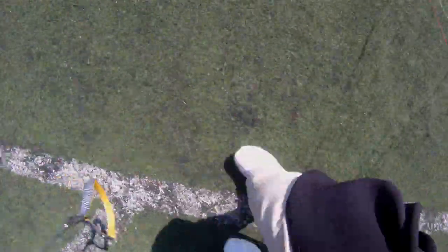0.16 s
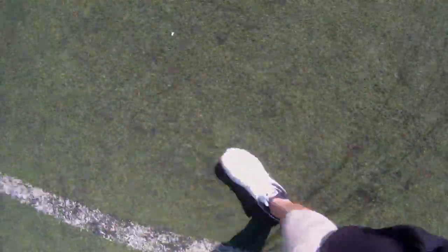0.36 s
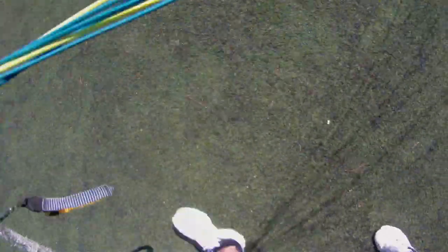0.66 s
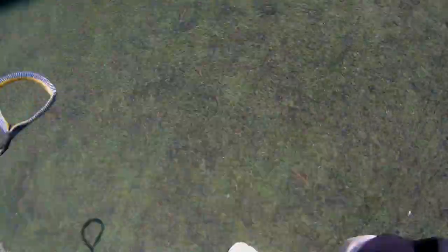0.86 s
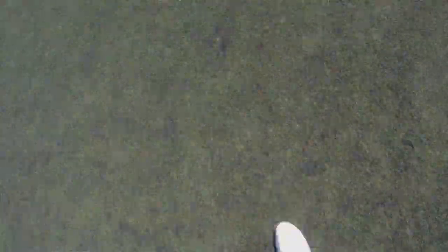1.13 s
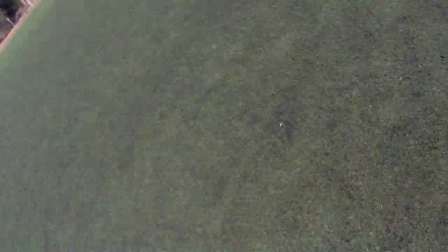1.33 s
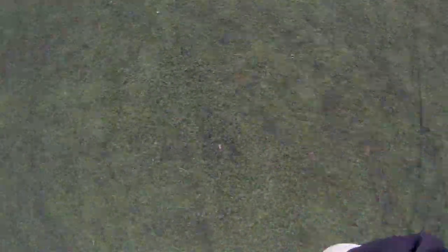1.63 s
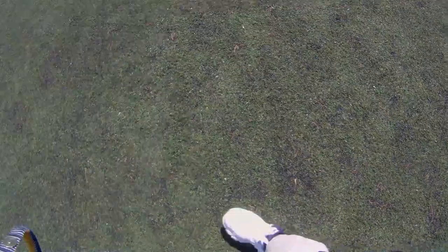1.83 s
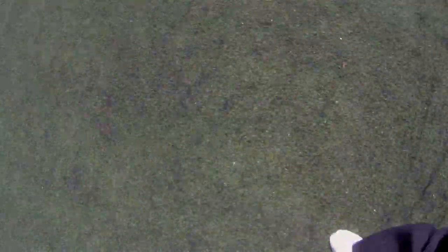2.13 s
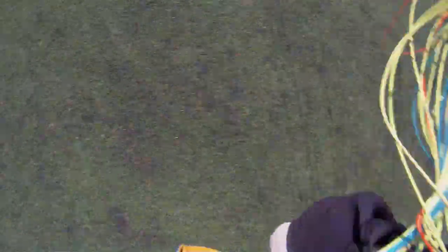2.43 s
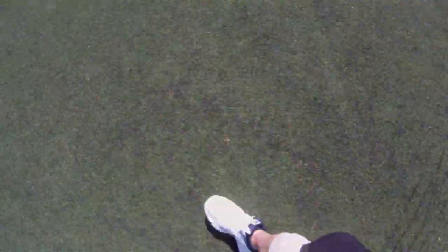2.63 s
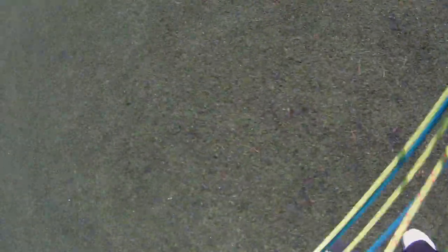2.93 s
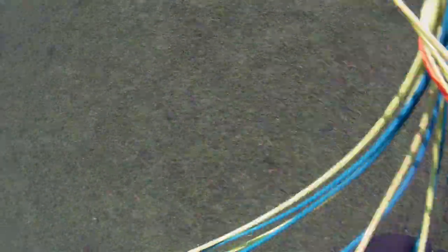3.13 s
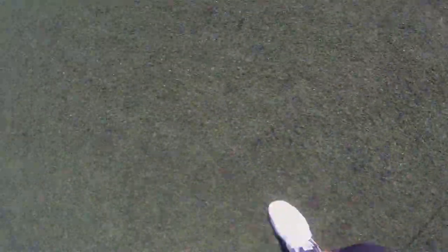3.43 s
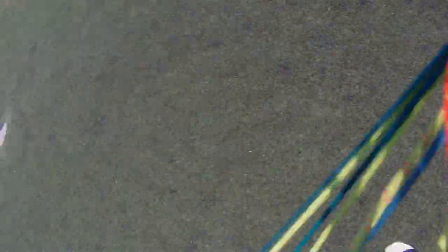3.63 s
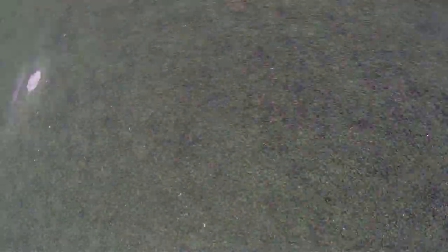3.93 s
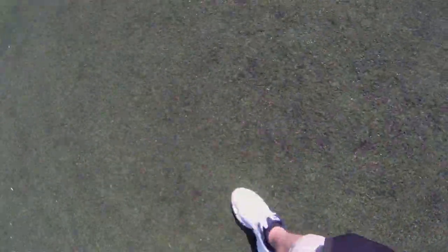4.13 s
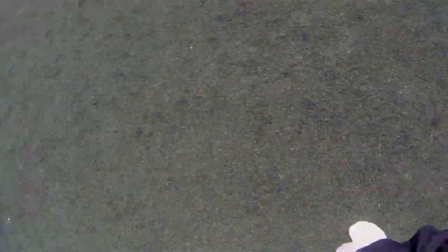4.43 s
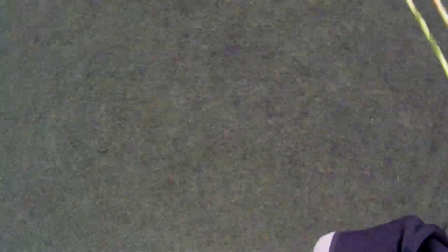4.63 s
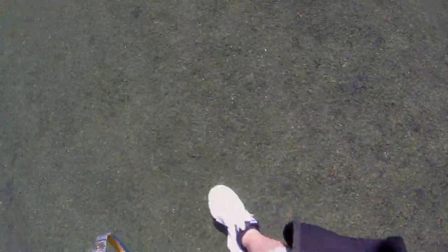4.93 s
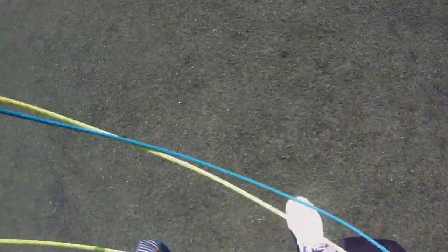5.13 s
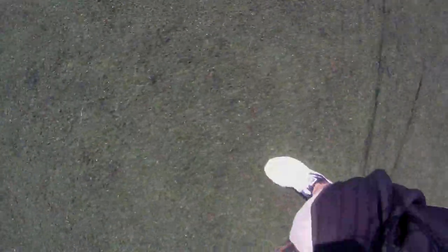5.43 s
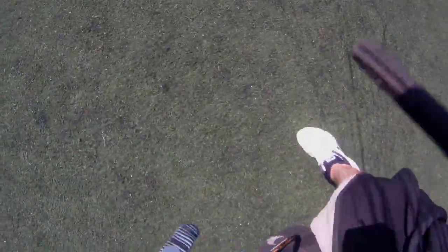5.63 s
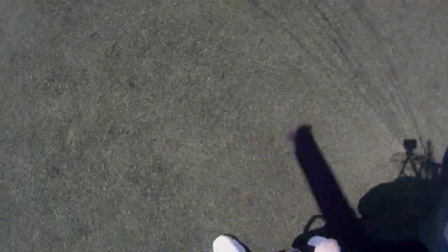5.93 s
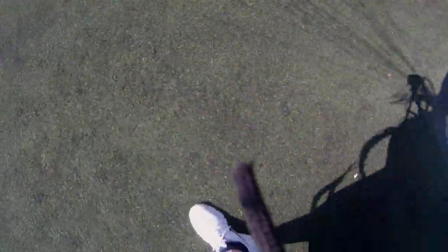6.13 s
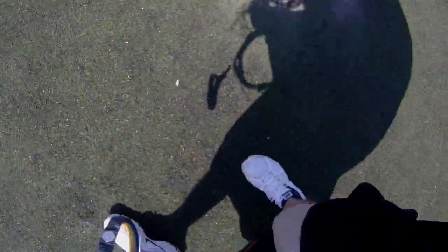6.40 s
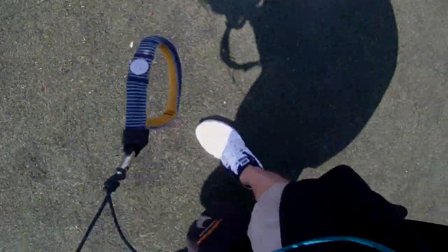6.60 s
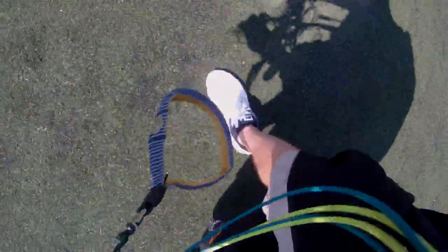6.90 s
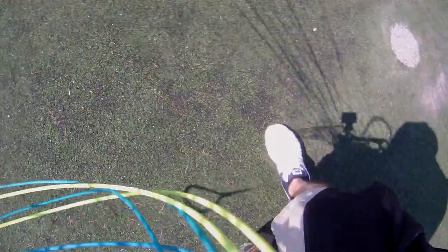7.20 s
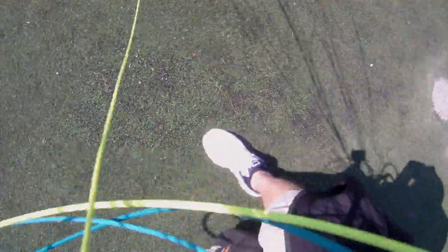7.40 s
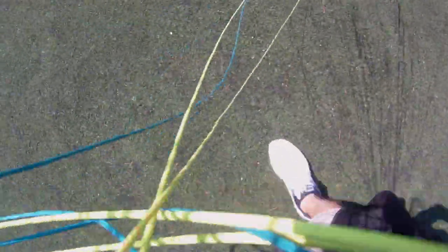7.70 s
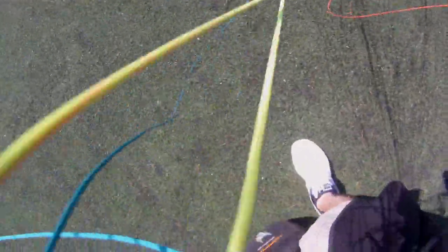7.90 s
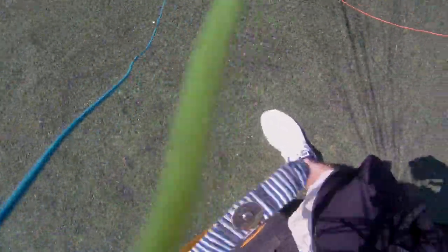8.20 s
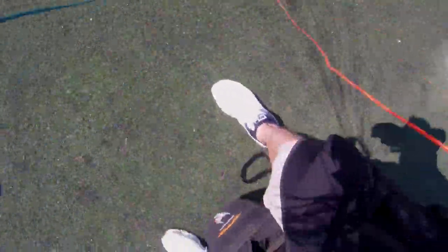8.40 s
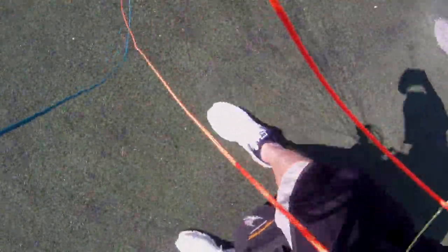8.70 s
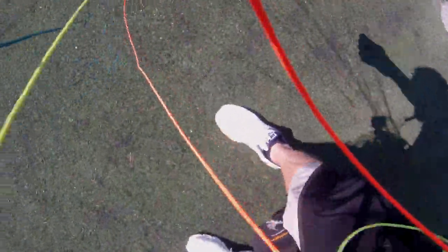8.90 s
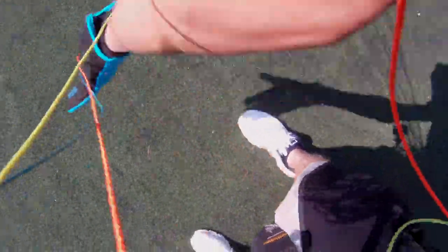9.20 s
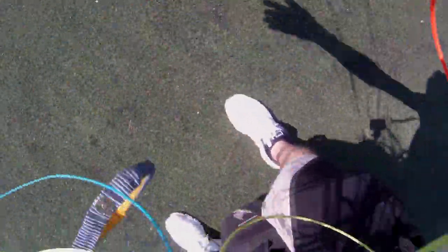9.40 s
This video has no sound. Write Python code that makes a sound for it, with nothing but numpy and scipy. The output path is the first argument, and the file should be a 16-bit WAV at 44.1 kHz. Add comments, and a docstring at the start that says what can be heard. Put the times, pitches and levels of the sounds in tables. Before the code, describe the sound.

Nylon fabric rubs and crinkles very close to a body-worn microphone on an open field, over faint wind rumble. At about 0.5 seconds comes a loud, sharp cluster of snaps with a knock, and around 1 second another crackling burst with a short strap creak. Faint, dull footsteps on turf run from 1 to 6 seconds, nearly three a second. The cloth settles into quiet brushing, with crisp bursts near 3, 3.7 and 5.3 seconds. Light hardware taps sound at 5 seconds and cluster between 5.9 and 6.6, among more crinkles. A thin creak at 7.6 seconds leads into a line zipping over the weave, rising and falling in pitch twice between 7.8 and 8.3, with loud rustling. Rubbing and small creaks continue to 9 seconds, the wind grows slightly, and a last rustle swells at about 9.5.

```python
"""On an open field, a pilot walks over turf gathering a nylon wing and its lines. Wind rumble and footfalls lie
beneath the friction of cloth: it rubs and crinkles, straps creak, and a line zips over the weave. Buckling
creases snap in short bursts, the larger ones with a dull low body. The near sounds excite the resonant modes of
the housing of a small body-worn camera, and the loudest snaps overload its microphone."""
import sys
import numpy as np
from scipy import signal
from scipy.io import wavfile

SR = 44100
rng = np.random.default_rng(int(sys.argv[2]) if len(sys.argv) > 2 else 0)


def persist_wave(psi):
    """Save psi, clipped to +-1, as 16-bit WAV."""
    counts = np.round(np.clip(psi, -1, 1) * 32767).astype(np.int16)
    wavfile.write(sys.argv[1], SR, np.atleast_2d(counts).T)


N = 421155


def from_db(db):
    """Amplitude ratio of a level: a factor of ten per 20 dB."""
    return 10 ** (np.asarray(db) / 20)


def unit_rms(x):
    """Normalisation to unit mean power."""
    return x / np.sqrt(np.mean(x ** 2) + 1e-20)


def curves(rows):
    """Linear interpolation of each column over the times in the first."""
    times, *columns = np.transpose(rows)
    return [np.interp(np.arange(N) / SR, times, column) for column in columns]


def drift(corner_hz):
    """Random modulation: low-passed noise of unit rms."""
    pole = np.exp(-2 * np.pi * corner_hz / SR)
    return unit_rms(signal.lfilter([1], [1, -2 * pole, pole * pole], rng.standard_normal(N + SR))[SR:])


def band(x, low_hz, high_hz):
    """Band-pass filtering with a maximally flat passband."""
    return signal.sosfilt(signal.butter(2, [low_hz, high_hz], "band", fs=SR, output="sos"), x)


def unit_energy(sounds):
    """Normalisation of each row to unit energy."""
    return sounds / np.linalg.norm(sounds, axis=1, keepdims=True)


def superpose(starts, levels_db, sounds):
    """Superposition of transients; each level is that of the energy spread over 4 ms."""
    sounds = from_db(levels_db) * unit_energy(sounds) * np.sqrt(.004 * SR)
    out = np.zeros(N + SR)
    for start, sound in zip(starts, sounds):
        i = int(start * SR)
        out[i:i + len(sound)] += sound
    return out[:N]


def crinkle(per_s, spread_db, hiss):
    """Shot noise: tiny creases of uneven size give way in clumps, over friction hiss."""
    sizes = from_db(spread_db * np.minimum(rng.exponential(1, N), 5)) * rng.choice([-1, 1], N)
    buckles = rng.random(N) < per_s * from_db(5 * drift(25)) / SR
    mix = (unit_rms(sizes * buckles) + hiss * rng.standard_normal(N)) / np.sqrt(1 + hiss ** 2)
    return mix * from_db(1.83 * drift(30.27))


# Modes of the camera housing: (frequency [Hz], bandwidth [Hz], gain [dB])
LOW_MODES = [(736, 390, -15.5), (1346, 370, -3.5)]
MID_MODES = [(2225, 180, -0.6), (2938, 324, 5.5), (3584, 410, 4), (4847, 302, 4), (5470, 605, -6),
             (7080, 870, -14)]
HIGH_MODES = [(10200, 1700, -15), (12740, 18000, 1), (15600, 560, 13)]
def resonate(x, modes):
    """Modal superposition: damped resonators in parallel, with alternating signs."""
    out = 0
    for k, (hz, width_hz, db) in enumerate(modes):
        radius = np.exp(-np.pi * width_hz / SR)
        b = (1 - radius * radius) / 2 * np.array([1, 0, -1])
        a = [1, -2 * radius * np.cos(2 * np.pi * hz / SR), radius * radius]
        out = out + (-1) ** k * from_db(db) * signal.lfilter(b, a, x)
    return out


def ring_each(bursts, pitches_hz, relative_width):
    """Resonance at constant Q: each burst drives one mode at its own pitch."""
    return np.array([resonate(burst, [(hz, relative_width * hz, 0)])
                     for burst, hz in zip(bursts, pitches_hz)])


def coupling(mode_hz, pitch_hz, slope_db, neutral_hz):
    """Modal coupling: small, high creases feed the upper housing modes, large folds the lower."""
    tilt_db = slope_db * np.log2(mode_hz / 3600) * np.log2(pitch_hz / neutral_hz)
    return from_db(np.clip(tilt_db, -5, 15))


def air():
    """Noise floor: the steady faint hiss of the field and the microphone."""
    return from_db(-70.5) * unit_rms(band(rng.standard_normal(N), 4100, 21000))


# Motion of body and cloth; the last two columns shape the rubbing of the wing:
# (time [s], scuff level [dB], wind level [dB], cloth treble [dB], sliding hiss to crinkle [ratio])
MOTION = [(0, -56.5, -63, -17, 1.3), (1.3, -52, -61, -29, 0.52), (1.6, -56.5, -67.5, -31, 1.6),
          (3.3, -53, -65, -32, 1), (4.5, -56, -68.5, -20, 1.9), (5.4, -54.5, -65, -21, .9),
          (6.3, -60, -67.5, -37, 0.53), (7.4, -61, -75.5, -16, 1.07), (8.0, -62, -61, -33, 3.2),
          (8.1, -58, -53, -24, 3), (8.62, -59, -62.5, -19, 1.6), (8.76, -62, -49.5, -25, 2.5),
          (9.2, -57, -49, -33, 0.68), (9.55, -51, -55, -23, 1.5)]
def scuff_and_wind():
    """Friction of clothes and turf gives a dull scuff; wind at the microphone port, a lumpy rumble."""
    scuff_db, wind_db, *_ = curves(MOTION)
    scuff = unit_rms(band(crinkle(600, spread_db=4, hiss=1.6), 339, 1360))
    rumble = unit_rms(band(rng.standard_normal(N), 45, 330) * from_db(3 * drift(8)))
    return from_db(scuff_db) * scuff + from_db(wind_db) * rumble


# Feet landing on turf: (time [s], relative level [dB], pitch [Hz])
FOOTFALLS = [(1.034, -41, 377), (1.409, -43, 266), (2.242, -49, 271), (2.595, -42.5, 332), (2.95, -48, 213),
             (3.334, -47, 342), (3.691, -41, 375), (4.037, -40.5, 246), (4.425, -42, 413),
             (4.798, -44, 296), (5.3, -52, 328), (5.932, -44.5, 85), (8.087, -56, 199)]
def footfalls():
    """Body conduction carries each footfall up as a soft, dull puff."""
    t, out = np.arange(SR // 4) / SR, np.zeros(N + SR)
    envelope = t / 0.016 * np.exp(1 - t / 0.022)
    for start, db, hz in FOOTFALLS:
        i = int(start * SR)
        puff = unit_rms(band(rng.standard_normal(len(t)), 0.53 * hz, 2.9 * hz))
        out[i:i + len(t)] += from_db(db - 6) * envelope * puff
    return out[:N]


# Low bodies of the larger crease snaps: (time [s], level over 4 ms [dB], pitch [Hz])
SNAP_BODIES = [(0.5223, -18.5, 819), (4.1381, -38.5, 1290), (4.437, -33, 360), (5.0167, -22, 1070),
               (5.9021, -30.5, 1290), (6.2554, -25.5, 1030), (6.2905, -35, 915), (6.379, -42, 1100),
               (6.443, -33, 1070), (6.485, -30, 1010), (6.579, -34.5, 1300), (8.466, -33.5, 1100)]
def snap_bodies(decay_s=.0025):
    """Impact excitation: a larger crease snap thumps through the housing and drives one heavily damped mode."""
    starts, level_db, pitch_hz = np.transpose(SNAP_BODIES)
    t = np.arange(SR // 30) / SR
    bursts = rng.standard_normal((len(starts), len(t))) * np.exp(-t / decay_s)
    return superpose(starts, level_db[:, None], ring_each(bursts, pitch_hz, relative_width=.8))


# Strap creaks, hollow scrapes, soft scuffs and the line's slower third pull: # (centre time [s], pitch [Hz],
# duration [s], level [dB], resonator bandwidth to pitch [ratio])
STRAP_CREAKS = [(0.989, 1120, 0.067, -23.5, 0.4), (2.4, 866, 0.052, -40.5, 0.25),
                (3.145, 890, 0.053, -40.5, 0.18), (3.905, 950, 0.034, -42.5, 0.65),
                (4.172, 1060, 0.021, -38.5, 0.59), (4.67, 900, 0.03, -49, .5),
                (7.588, 2220, 0.12, -36, 0.17), (7.593, 3600, 0.11, -29.5, 0.12),
                (8.521, 870, 0.061, -47, .15), (8.81, 1350, 0.11, -40, .15),
                (8.877, 1650, 0.087, -38.5, 0.17)]
def creaks():
    """Resonant filtering turns friction noise into rough tones that set in, hold and stop."""
    t, out = np.arange(N) / SR, 0
    for centre, hz, duration, db, relative_width in STRAP_CREAKS:
        mode = [(hz, relative_width * hz, 0)]
        tone = unit_rms(resonate(resonate(rng.standard_normal(N), mode), mode))
        envelope = np.exp(-(2 * (t - centre) / duration) ** 4)
        out = out + from_db(db) * envelope * tone
    return out


# A line pulled over the weave in two quick strokes, a slower third pull sounds among the creaks: (time [s],
# thread crossing rate [Hz], relative level [dB])
LINE_PULLS = [(7.81, 990, -55), (7.85, 1130, -29), (7.885, 1210, -16.5), (7.92, 1480, -19),
              (7.95, 2280, -13.5), (7.98, 2320, -25), (8.01, 1900, -19.5), (8.05, 1500, -22.5),
              (8.1, 820, -27.5), (8.14, 880, -37), (8.19, 1960, -17.5), (8.212, 2040, -20),
              (8.24, 1550, -28), (8.28, 890, -58)]
def line_zip(unevenness=.048, hiss_db_per_octave=15):
    """Periodic excitation: pitch is the rate of crossing threads; slow pulls have a weak fundamental."""
    rate_hz, level_db = curves(LINE_PULLS)
    pulled = level_db > LINE_PULLS[0][2]
    speed = rate_hz / rate_hz.max()
    phase = 2 * np.pi * np.cumsum(rate_hz * (1 + unevenness * drift(150))) / SR
    harmonics = sum(share * from_db(3.5 * drift(80)) * np.sin(k * phase)
                    for k, share in [(1, speed ** 1.2), (2, 0.36), (3, 0.15)])
    tone = pulled * from_db(level_db) * harmonics
    hiss = pulled * unit_rms(resonate(rng.standard_normal(N), HIGH_MODES))
    hiss_db = -37 + hiss_db_per_octave * np.log2(speed)
    return resonate(tone, LOW_MODES + MID_MODES) + from_db(-8) * tone + from_db(hiss_db) * hiss


# Unbroken faint brushing of cloth: (time [s], level [dB])
BRUSHING = [(0, -52), (.5, -50), (1.0, -44), (1.65, -49), (2.09, -54), (2.37, -48), (2.47, -44.5),
            (2.88, -46.5), (3.3, -44.5), (3.57, -53.5), (3.95, -44), (4.34, -52.5), (4.9, -47.5),
            (5.2, -54), (6.15, -51.5), (6.6, -38), (7.0, -50), (7.7, -46), (9.1, -51.5), (9.55, -36.5)]
# Cloth dragged or crushed: (time [s], duration [s], starting level [dB], swell [dB], pitch [Hz])
HANDFULS = [(0.523, 0.051, -15, -6, 4230), (0.588, 0.16, -26.5, -6, 3100), (0.872, 0.07, -37.5, 2.5, 3600),
            (0.95, 0.075, -16, 4, 4150), (1.03, 0.093, -29, -6, 3000), (1.149, 0.014, -25, -8.5, 3370),
            (1.222, 0.055, -25.5, -6, 3050), (1.30, .13, -33, -9, 3200), (1.447, 0.068, -35, 3.5, 2800),
            (1.712, 0.035, -38, 6, 3170), (2.172, .14, -48.5, 8.5, 3270), (2.905, .17, -42, 4.5, 3240),
            (3.14, 0.029, -40.5, 9.5, 3300), (3.222, 0.091, -39, -9, 3060), (3.684, 0.033, -41.5, 8, 2900),
            (3.72, 0.15, -26, -0.5, 4440), (5.202, 0.03, -30, -21, 2940), (5.318, 0.11, -22.5, -1.5, 4560),
            (5.464, 0.015, -32.5, -0.5, 3440), (5.586, 0.064, -37, 3.5, 3140),
            (5.77, 0.038, -46.5, 11, 3130), (5.888, 0.054, -41, 1, 2900), (6.261, 0.12, -26, -15.5, 2880),
            (6.447, 0.15, -40, 8, 3270), (6.7, 0.14, -42.5, 7, 3000), (6.797, 0.12, -36, -4, 3030),
            (7.216, 0.167, -39, -3.5, 3000), (7.454, 0.048, -32.5, -5, 3680), (7.53, 0.11, -39, 10.5, 3400),
            (7.748, 0.11, -36.5, 10.5, 3380), (7.853, 0.17, -23, 3.5, 3900),
            (8.032, 0.18, -25.5, -8.5, 3730), (8.174, 0.14, -26.5, -4, 3390),
            (8.334, 0.11, -38, 16.5, 3330), (8.464, 0.51, -31, -3.5, 3370), (8.927, .15, -37.5, -4.5, 3300),
            (9.17, 0.24, -48, 6, 2770), (9.368, 0.084, -34, 10, 3550), (9.493, 0.07, -29, 9.5, 3350)]
def rub_level_and_pitch(brush_hz=3070, grip_s=.012, release_s=.06):
    """Incoherent sources add in power; the pitch is their power-weighted mean."""
    t = np.arange(N) / SR
    brush_db, = curves(BRUSHING)
    power = from_db(2 * brush_db)
    weighted_hz = brush_hz * power
    for start, duration, db, swell_db, hz in HANDFULS:
        span = slice(int((start - .05) * SR), int((start + duration + .15) * SR))
        corners_s = [-grip_s, 0, duration, duration + release_s]
        envelope_db = np.interp(t[span] - start, corners_s, [-60, 0, swell_db, swell_db - 60])
        handful_power = from_db(2 * (db + envelope_db))
        power[span] += handful_power
        weighted_hz[span] += hz * handful_power
    return 10 * np.log10(power), weighted_hz / power


def cloth_rub(grain_db=1.5):
    """Forced vibration: crinkling cloth drives the housing; each low and mid mode swells on its own."""
    level_db, pitch_hz = rub_level_and_pitch()
    *_, treble_db, sliding = curves(MOTION)
    cloth = crinkle(900, spread_db=3.5, hiss=np.abs(sliding))
    housing, power = 0, 0
    for k, mode in enumerate(LOW_MODES + MID_MODES):
        share = coupling(mode[0], pitch_hz, slope_db=14.8, neutral_hz=3250)
        drive = cloth * from_db(grain_db * rng.standard_normal(N))  # creases feed the modes unevenly
        ringing = resonate(drive, [mode])
        housing = housing + (-1) ** k * share * from_db(2.24 * drift(17.5)) * ringing
        power = power + share ** 2 * np.mean(ringing ** 2)
    treble_db = treble_db + 15 * np.log2(pitch_hz / 3500)
    treble = from_db(treble_db) * unit_rms(resonate(cloth, HIGH_MODES))
    return from_db(level_db) * (housing / np.sqrt(power) + treble)


# Creases letting go: (time [s], level over 4 ms [dB], pitch [Hz])
CREASES = [(0.516, -6.5, 3720), (0.5225, -4, 5100), (0.53, -1.5, 5250), (0.5439, -3.9, 4600),
           (0.5535, -16, 3570), (0.5928, -17, 3250), (0.6033, -15.5, 3630), (0.7261, -25, 3020),
           (0.86, -31, 5000), (0.8727, -21.5, 2420), (0.9199, -7.5, 3360), (0.9523, -18, 4700),
           (0.961, -19, 5070), (0.968, -11, 3300), (0.983, -7, 4420), (0.993, -10, 4470),
           (0.9976, -10, 4270), (1.0118, -16, 3510), (1.0214, -17, 3790), (1.0264, -13, 3370),
           (1.071, -27.5, 3000), (1.1192, -20, 3760), (1.1454, -20, 3660), (1.2133, -10.5, 3400),
           (1.2485, -15.5, 3020), (1.2652, -18.5, 3560), (1.2801, -22.3, 3130), (1.4473, -18, 5240),
           (1.706, -30, 3100), (1.7099, -24.5, 4630), (1.8722, -34.5, 3200), (2.2533, -27.5, 3040),
           (2.72, -36.5, 4740), (2.9036, -27, 3680), (2.9084, -28, 2150), (2.918, -16.5, 3130),
           (3.033, -11.5, 4360), (3.041, -15.5, 5230), (3.1665, -33, 3200), (3.2645, -35, 3230),
           (3.289, -30.5, 2710), (3.6448, -36, 3090), (3.6946, -19, 3100), (3.721, -13, 5300),
           (3.724, -24, 5150), (3.729, -11, 4150), (3.7618, -19.5, 4400), (3.8001, -16, 5500),
           (3.82, -16, 4800), (3.8634, -28, 4670), (3.952, -33.5, 4800), (4.1388, -26, 3570),
           (4.4641, -26.5, 2810), (4.599, -39.5, 2860), (4.83, -42, 4700), (4.9645, -25.5, 5000),
           (5.0174, -24.5, 3250), (5.1959, -27, 3600), (5.2971, -9.5, 5250), (5.302, -17, 5100),
           (5.3198, -13.5, 5370), (5.3508, -17, 5080), (5.4238, -22, 3600), (5.4435, -21.5, 2950),
           (5.5902, -17.5, 3540), (5.8931, -26, 3160), (5.901, -15, 4970), (6.0654, -33.5, 1180),
           (6.083, -32, 2920), (6.216, -27, 2830), (6.2552, -13, 4380), (6.2907, -14, 3900),
           (6.3047, -18.5, 3700), (6.4406, -22, 3770), (6.4532, -23.5, 4070), (6.5304, -23, 5230),
           (6.601, -27, 3550), (6.655, -29, 3200), (6.698, -25, 3280), (6.7054, -22, 3200),
           (6.8045, -16.5, 3780), (6.8087, -20, 3700), (6.889, -29, 4700), (7.065, -30.5, 2670),
           (7.1385, -31, 2870), (7.178, -23, 2660), (7.4426, -24, 3460), (7.534, -27, 3600),
           (7.668, -27, 3210), (7.7032, -24, 5260), (7.742, -25.5, 4400), (7.785, -13.5, 5230),
           (7.7978, -16.5, 3400), (7.984, -19, 5600), (8.422, -14.5, 5270), (8.4416, -18.5, 5300),
           (8.6118, -15, 3860), (9.181, -36.5, 3220), (9.2324, -32.5, 2850), (9.4775, -23, 2970)]
def crease_snaps(median_decay_s=.0017, treble_decay_s=.00064):
    """Buckling: a brief burst rings both crease and housing; harder and smaller snaps are crisper."""
    starts, level_db, pitch_hz = np.transpose(CREASES)[:, :, None]
    t = np.arange(SR // 30) / SR
    draws = rng.standard_normal((len(starts), 10 + len(t)))
    decay_scatter, treble_scatter, mode_scatter, noise = np.split(draws, [1, 2, 10], axis=1)
    decay_s = median_decay_s * from_db(2.5 * decay_scatter)
    bursts = noise * np.exp(-(t / decay_s) ** 1.05)
    crease = from_db(-1) * unit_energy(ring_each(bursts, pitch_hz[:, 0], relative_width=.13))
    housing = 0
    for k, mode in enumerate(MID_MODES):
        share = coupling(mode[0], pitch_hz, slope_db=6.5, neutral_hz=3290)
        ringing = from_db(3.13 * mode_scatter[:, [k]]) * resonate(bursts, [mode])
        housing = housing + (-1) ** k * share * ringing
    treble = unit_energy(resonate(bursts * np.exp(-t / treble_decay_s), HIGH_MODES))
    treble_db = -11.5 + 0.7 * level_db + 6 * np.log2(pitch_hz / 3500) + 2.5 * treble_scatter
    snaps = unit_energy(housing) + crease + from_db(treble_db) * treble
    return superpose(starts[:, 0], level_db, snaps)


def scene():
    """Superposition at one microphone; the near cloth saturates the capsule and carries little bass."""
    near = np.clip(cloth_rub() + crease_snaps() + line_zip() + creaks(), -.85, .85)
    near = signal.sosfilt(signal.butter(2, 450, "high", fs=SR, output="sos"), near)
    return (near + snap_bodies() + scuff_and_wind() + footfalls() + air())[None]


def record(dry):
    """Band limiting: a steep low-pass removes the highest treble."""
    stopband_hz = 16218
    return signal.sosfilt(signal.cheby2(14, 60, stopband_hz, fs=SR, output="sos"), dry)


dry = scene()
out = record(dry)
persist_wave(out)
```